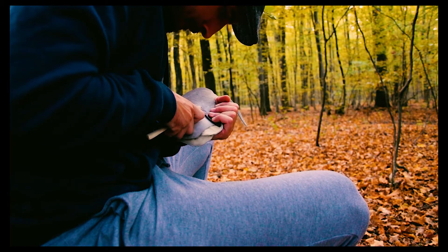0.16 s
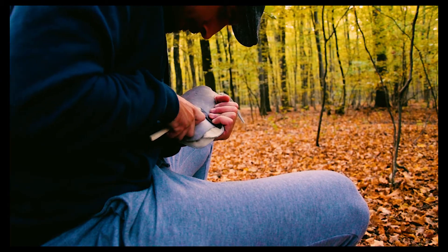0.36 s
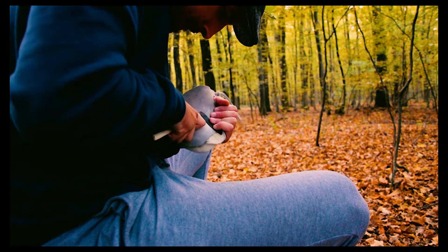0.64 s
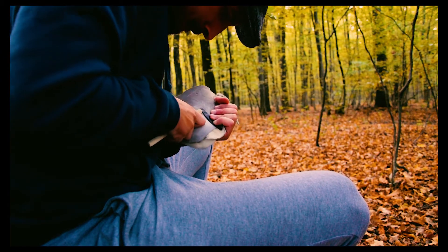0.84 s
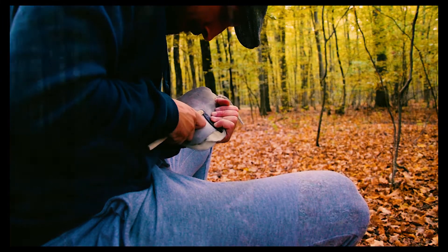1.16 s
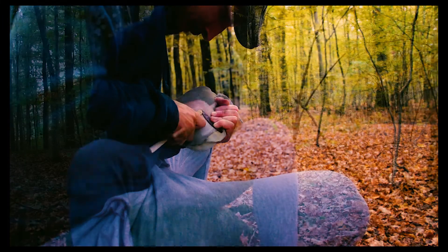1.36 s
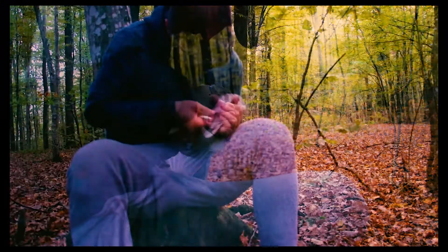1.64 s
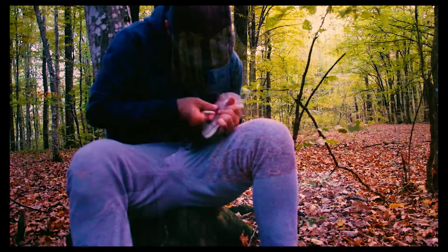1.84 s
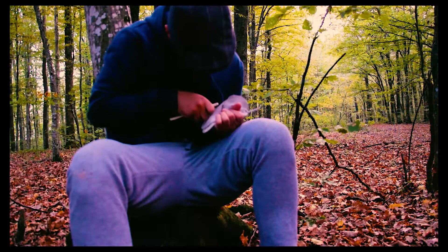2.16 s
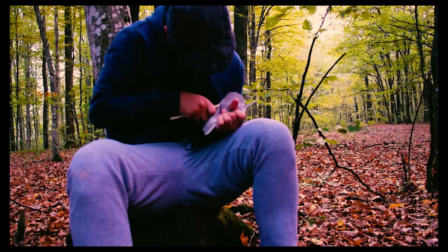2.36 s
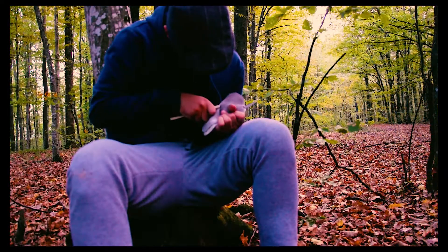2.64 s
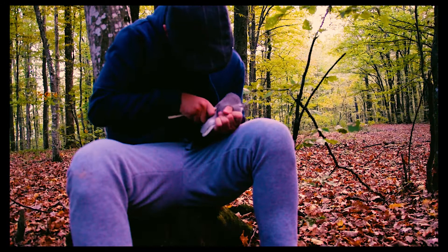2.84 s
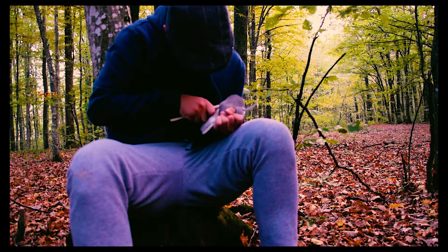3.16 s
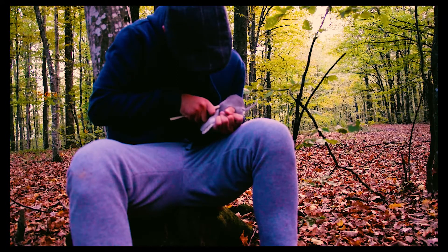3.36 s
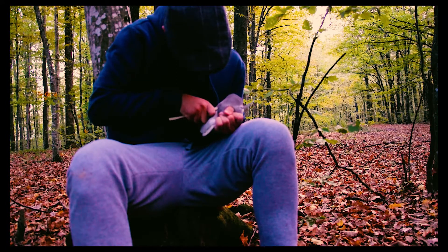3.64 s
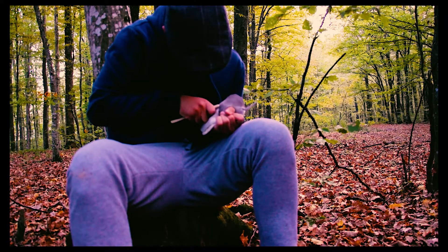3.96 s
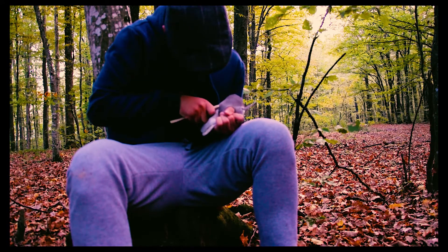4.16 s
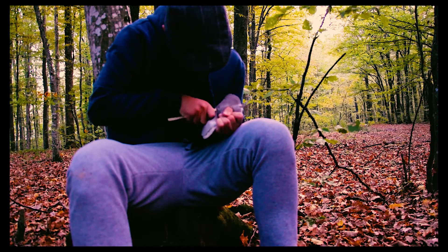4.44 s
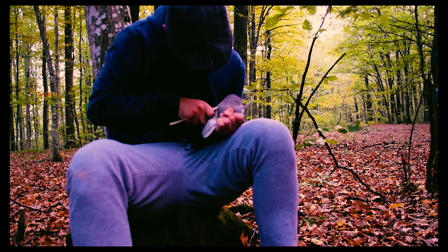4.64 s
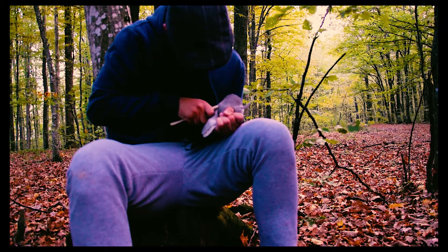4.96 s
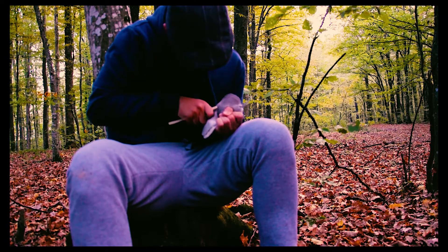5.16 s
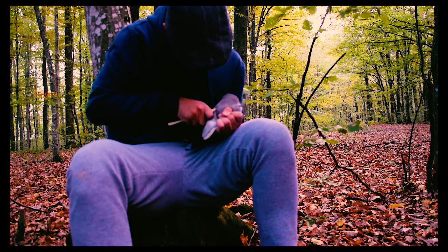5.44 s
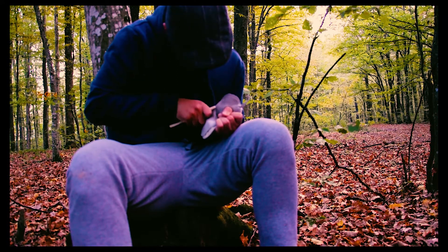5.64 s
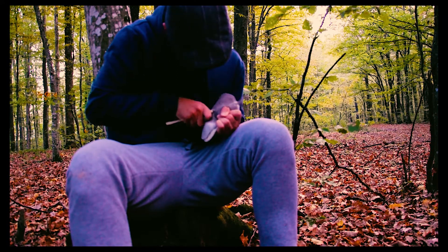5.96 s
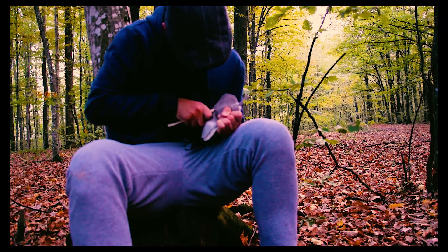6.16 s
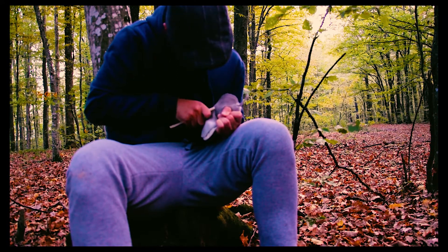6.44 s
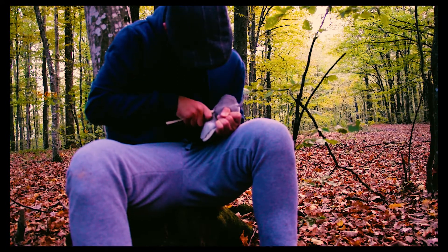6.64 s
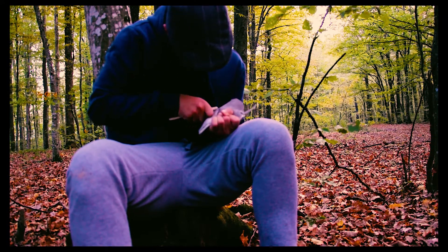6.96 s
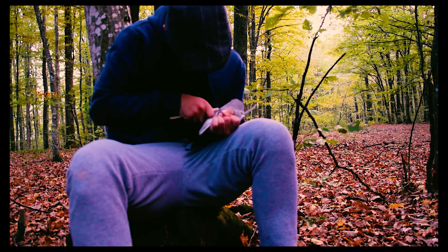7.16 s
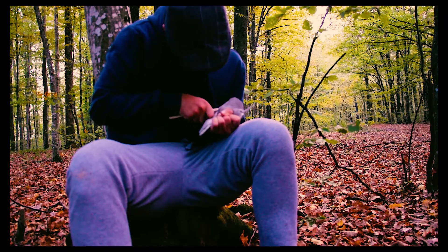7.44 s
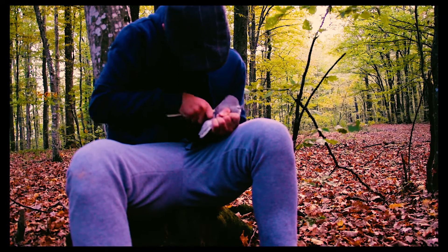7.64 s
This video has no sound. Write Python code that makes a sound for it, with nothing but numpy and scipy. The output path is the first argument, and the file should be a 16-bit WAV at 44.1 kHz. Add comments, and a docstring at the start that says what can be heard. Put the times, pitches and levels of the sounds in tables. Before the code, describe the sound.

Close in front, in a still beech wood, chips are pressed off a flint blade on a leather pad. Soft air hiss and a faint high whine, leaning right, run throughout; the whine shifts slightly around 1.6 seconds. A sharp click with a dull, woody thud comes at 0.5, small scrapes near 0.9 and 1.1, a grit tick at 1.4 and a crisp snap at 1.5. A light click falls at 2.8, then a weak cluster at 3.4 to 3.5. Loud, hard double snaps strike at 4.3 and 5.2, the second the strongest. A bright tick at 5.8 precedes another pair at 5.95; a duller snap follows at 6.6, a scrape at 7.5 and a last light double click at 7.6. From 2.2 to 6.4 a distant small bird gives quick falling-then-arched chirps, with faint whistles at 3.4 and after 7. Trees return short, thin bright tails.

```python
"""Flint chipping in a beech wood

Small chips are pressed off a flint blade held on a leather pad. Each fracture is an impulse through the
resonances of blade, tool and pad; many chips stall and break a second time. Grit ticks and short scrapes are
filtered random pulses. The trees return a thin bright tail of decaying noise, a small bird far off repeats a
two-part call of gliding sines, and a faint high whine of narrow noise bands lies in the still air."""
import sys
import numpy as np
from scipy import signal
from scipy.fft import rfft, irfft
from scipy.io import wavfile

SR = 44100
rng = np.random.default_rng(int(sys.argv[2]) if len(sys.argv) > 2 else 0)


def output_pcm(signal):
    """Save a mono or channel-first signal as 16-bit PCM at the path in sys.argv[1].

    Samples are clipped to [-1, 1] before scaling.
    """
    pcm = np.clip(np.atleast_2d(signal).T, -1, 1) * 32767
    wavfile.write(sys.argv[1], SR, np.round(pcm).astype(np.int16))


N = 343980

# Spectrum of the still air. Each row: frequency in Hz, relative power density in dB.
AIR_SPECTRUM = [(25, -27), (45, -16), (70, -4.5), (180, -5), (370, -0.5), (700, 2), (1400, 0.5),
                (2800, -2.5), (5000, -6), (6400, -14), (7200, -14), (10000, -17), (15000, -23.5)]
# Likeness of the two channels. Each row: frequency in Hz, magnitude-squared coherence from 0 to 1.
AIR_COHERENCE = [(60, 0.99), (130, 0.54), (290, 0.14), (640, 0.25), (1410, 0.073), (3100, 0.23),
                 (6820, 0.083), (15000, 0)]
# Resonances of the whine before and after its change. Each row: centre in Hz, width in Hz, relative level in dB.
WHINE_EARLY = [(1084, 170, -5), (3840, 274, 2.5), (4390, 140, -6), (5400, 430, -7.5), (6160, 580, -11.5)]
WHINE_LATE = [(642, 94, -9), (1892, 127, -7), (3897, 236, 2), (4400, 110, -6), (5500, 470, -10.5),
              (6290, 200, -15)]
# Balance of the whine, mostly to the right. Each row: frequency in Hz, right minus left in dB.
WHINE_BALANCE = [(2400, -1.5), (3800, 6), (6200, 4)]
# A thin steady tone at the very top. In order: frequency in Hz, early rms level in dB, late rms level in dB.
THIN_TONE = (15714, -85, -102)
# Scatter from trunks and dry leaves.
# Each row: band centre in Hz, relative level in dB, 60 dB decay time in seconds before the linger factor.
SCATTER = [(500, -12, 0.44), (2190, -3, 0.6), (3380, -3, 0.66), (4900, 8, 0.58), (7000, 10.5, 0.38),
           (9600, 6, 0.42), (14000, 10, 0.3)]
# The bird's two-part calls. Each row: start in seconds, chirp level in dB.
BIRD_CALLS = [(2.211, -55.5), (2.374, -55), (2.912, -51), (3.085, -51), (3.716, -51), (3.920, -51.5),
              (4.264, -50), (4.419, -50), (4.779, -51), (5.176, -50.5), (5.824, -48), (6.210, -53),
              (6.347, -52)]
# Pitch contours of the falling note and the arched chirp: pitches in Hz at even steps.
FALL_HZ = [7600, 7600, 6450, 4960, 4940, 4900]
CHIRP_HZ = [2370, 2628, 3089, 3658, 3350, 2770, 2440]
# The bird's wavering whistles. Each row: start in seconds, pitch in Hz, level in dB.
WHISTLES = [(3.384, 2500, -62), (7.056, 2340, -62.5), (7.631, 3310, -64.5), (7.697, 2495, -61.5)]
# Harmonics of a whistle, from the fundamental up: level in dB added to that of the whistle.
WHISTLE_PARTIALS_DB = [1.5, -2.5, -14]
# Slips of the tool tip on the edge. Each row: start in seconds, level in dB, length in seconds.
SCRAPES = [(0.886, -48.5, 0.0086), (0.897, -49.5, 0.014), (1.061, -58.5, 0.0097), (6.557, -53, 0.011),
           (7.473, -53, 0.0042)]
# The loudest grains of grit crushed at the edge. Each row: start in seconds, peak level in dB.
LOUD_GRIT = [(0.837, -44.5), (1.384, -38), (1.4275, -43.5), (4.9293, -47), (5.7888, -35), (6.0764, -46),
             (6.692, -40)]
# Chips pressed off the blade. Each row: start in seconds, force in dB, ring pitch in Hz, pad thud in dB,
# tool knock in dB, crack centre in Hz, crack in dB relative to the force,
# stall before the second break in seconds, strength of the second break as a ratio to the first.
SNAPS = [(0.5341, 10.5, 2220, 14, 13, 5950, 2, 0.003, 0.38),
         (1.5131, 13.5, 2060, 3.5, 9.5, 11400, -9, 0.000049, 0),
         (2.8225, -1, 2360, -2.5, 1.5, 4250, -11.5, 0.0033, 1.2),
         (3.4338, -13, 2160, 3, -15, 4200, -6.5, 0.0023, 0.5),
         (3.4754, -16.5, 2100, -5, -20, 4200, -5, 0.0056, 0),
         (3.5156, -0.5, 2380, 3, 0.5, 4400, -13.5, 0.0028, 1.7),
         (4.3005, 21.5, 2670, 4.5, 7.5, 4000, -11, 0, 0),
         (4.335, 16.5, 2430, 6, 5.5, 4750, -10.5, 0.0026, 1.34),
         (5.1998, 11.5, 2300, -3, 4.5, 4160, -7, 0, 0), (5.2671, 24, 2770, -1, 11.5, 3980, -10.5, 0, 0),
         (5.9424, 16, 2350, -11, 9, 8350, -9.5, 0.0044, 0.47),
         (5.9749, 3, 2620, -2.5, -4, 4700, -15, .0037, 3.5),
         (6.6049, 10.5, 2310, -1, -8.5, 9000, -19, 0, 0),
         (7.5748, -2.5, 2150, 4.5, 1, 4800, -8, .0014, 0.97)]
# High modes of the blade, heard as the crack. Each row: centre in Hz, width in Hz, level in dB.
BLADE_MODES = [(4150, 480, 1.5), (5920, 1180, -2.5), (8540, 960, -2), (9780, 620, 0), (11500, 1600, -5.5)]
# Response of the pad as the blade settles into it.
# Each row: time in seconds, thud pitch in Hz, ratio of width to pitch, palm in dB relative to the thud.
PAD = [(.5, 572, 0.98, -38), (3.5, 470, 0.83, -24), (5.3, 440, 1.45, -3.5), (7.6, 434, 1.4, -10.5)]

FALL_DB, FALL_S = -61.5, 0.019
CHIRP_AFTER_S, CHIRP_S = 0.064, 0.031  # the chirp's delay after the start of the fall, and its length
WHISTLE_S = 0.0294
FINE_GRIT_DB, FINE_GRIT_SPREAD_DB = -56, 3  # mean and standard deviation of the peak level
CRACK_FALL_DB_PER_OCTAVE = 5.5  # modes away from the crack's centre are struck less
SECOND_PITCH = 0.94  # a second break rings a little lower
PALM_HZ, PALM_WIDTH_HZ = 166, 99
TOP_HZ = 16300

TIME = np.arange(N) / SR
FREQ = np.maximum(np.fft.rfftfreq(N, 1 / SR), 1)
SHORT = 2048  # samples in one brief sound
SHORT_TIME = np.arange(SHORT) / SR
SHORT_FREQ = np.maximum(np.fft.rfftfreq(SHORT, 1 / SR), 1)
MID_SIDE = np.array([[1], [-1]])  # sign of the side signal in left and right
LEFT_RIGHT = np.array([[-1], [1]])


def amp(db):
    """Gain is ten to the power of a twentieth of the decibels."""
    return 10 ** (np.asarray(db) / 20)


def unit(x):
    """Dividing by the rms gives unit rms."""
    return x / np.sqrt(np.mean(x ** 2))


def band(freq, hz, width):
    """A damped oscillator responds most near its own frequency, here with gain 1 at the centre."""
    return 1 / (1 + 1j * (freq ** 2 - hz ** 2) / (freq * width))


def along(points, freq):
    """Linear interpolation on a log-frequency axis joins (Hz, value) points."""
    hz, value = np.transpose(points)
    return np.interp(np.log(freq), np.log(hz), value)


def add(track, s, sound):
    """Superposition: a sound starting at s seconds sums into the track."""
    start = int(round(s * SR))
    track[start:start + len(sound)] += sound[:N - start]


def pan(x, right_db):
    """A level difference between the channels places a sound to one side."""
    return amp(LEFT_RIGHT * right_db / 2) * x


def hiss(gain, right_db=0):
    """Sums and differences of two independent noises set the coherence of a stereo pair of unit rms."""
    alike = np.sqrt(np.clip(along(AIR_COHERENCE, FREQ), 0, 1))
    mid, side = rfft(rng.standard_normal((2, N)))
    pair = mid * np.sqrt(1 + alike) + side * np.sqrt(1 - alike) * MID_SIDE
    return unit(irfft(gain * pan(pair, right_db), N))


def whine(resonances):
    """Narrow-band noise wavers around a pitch; the powers of the resonances add."""
    power = sum(np.abs(amp(db) * band(FREQ, hz, width) ** 2) ** 2 for hz, width, db in resonances)
    return hiss(np.sqrt(power), along(WHINE_BALANCE, FREQ))


def background(change_s=1.57, change_length_s=0.48):
    """An equal-power crossfade lifts the whine slightly in pitch as the thin tone recedes over still air."""
    late = np.clip((TIME - change_s) / change_length_s + 0.5, 0, 1)
    early_whine = amp(-57.0) * np.sqrt(1 - late) * whine(WHINE_EARLY)
    late_whine = amp(-56) * np.sqrt(late) * whine(WHINE_LATE)
    hz, early_db, late_db = THIN_TONE
    tone_level = amp(early_db + late * (late_db - early_db))
    tone = np.sqrt(2) * tone_level * np.sin(2 * np.pi * hz * TIME)
    air = amp(-59.0) * hiss(amp(along(AIR_SPECTRUM, FREQ)))
    return early_whine + late_whine + tone + air


def wood(x, db, linger, apart):
    """Multiple scattering from trees acts as decaying noise, whose top bands die sooner than the middle."""
    t, freq = TIME[:SR], np.arange(SR // 2 + 1) + 1
    mid, side = rfft(rng.standard_normal((2, SR)))
    noise = (mid + apart * side * MID_SIDE) / np.sqrt(SR)
    centres = np.array(SCATTER)[:, 0]
    echoes = 0
    for (hz, band_db, t60), own in zip(SCATTER, np.eye(len(SCATTER))):
        share = along(np.transpose([centres, own]), freq)  # 1 at its own centre, 0 at the others
        echoes = echoes + irfft(noise * share) * amp(band_db - 60 * t / (t60 * linger))
    return amp(db) * signal.fftconvolve(x[None], echoes, axes=1)[:, :N]


def knees(x, db, left_s, right_s):
    """Specular reflection: each knee throws back one weak, early copy."""
    return amp(db) * np.array([np.interp(TIME - lag, TIME, x, left=0) for lag in (left_s, right_s)])


def note(length, contour, waver):
    """Frequency modulation: a sine's phase accumulates a gliding, randomly varied pitch."""
    u = np.linspace(0, 1, int(length * SR))
    pitches = np.asarray(contour) * (1 + waver * rng.standard_normal(len(contour)))
    hz = np.interp(u, np.linspace(0, 1, len(contour)), pitches)
    swell = np.sqrt(2) * np.sin(np.pi * u)
    return swell * np.sin(2 * np.pi * np.cumsum(hz) / SR)


def bird():
    """Gliding tones form a quick fall answered by an arched chirp; wavering partials form the whistles."""
    out = np.zeros(N)
    for s, db in BIRD_CALLS:
        add(out, s, amp(FALL_DB) * note(FALL_S, FALL_HZ, waver=0.027))
        add(out, s + CHIRP_AFTER_S, amp(db) * note(CHIRP_S, CHIRP_HZ, waver=0.057))
    for s, hz, db in WHISTLES:
        for k, partial_db in enumerate(WHISTLE_PARTIALS_DB, 1):
            partial = note(WHISTLE_S, np.full(7, k * hz), waver=0.03)
            add(out, s, amp(db + partial_db) * partial)
    return out


def scrapes(body_hz=1150, width_hz=1900):
    """Stick-slip friction: dense random slips grate dully through the tool's resonance."""
    out = np.zeros(N)
    for s, db, length in SCRAPES:
        swell = np.sin(np.pi * np.minimum(SHORT_TIME / length, 1))
        slips = swell * rng.standard_normal(SHORT) ** 3  # cubing makes the noise spiky
        grating = irfft(rfft(slips) * band(SHORT_FREQ, body_hz, width_hz) ** 4)
        add(out, s, amp(db) * np.sqrt(length * SR) * grating / np.linalg.norm(grating))
    return out


def crumble(db, decay_s):
    """Brittle failure: the spectrum of one clean break and a fading shower of micro-cracks."""
    shower = rng.standard_normal(SHORT) ** 3 * np.exp(-SHORT_TIME / decay_s)
    return 1 + amp(db) * rfft(shower) / np.linalg.norm(shower)


def grit(count=7):
    """Brittle crushing: grains too light to move the blade give thin ticks, the fine ones at random times."""
    out = np.zeros(N)
    fine = [(rng.uniform(0, TIME[-1]), rng.normal(FINE_GRIT_DB, FINE_GRIT_SPREAD_DB)) for _ in range(count)]
    for s, db in LOUD_GRIT + fine:
        tick = irfft(band(SHORT_FREQ, hz=9000, width=8500) ** 2 * crumble(db=0, decay_s=0.00079))
        add(out, s, amp(db) * tick / np.abs(tick).max())
    return out


def fracture(force_db, ring_hz, knock_db, crack_hz, crack_db, thud=0, ring_width_hz=880,
             tool_hz=1190, tool_width_hz=820, edge_hz=13000):
    """Sudden release excites modes: grip sets the ring, chip size the high modes, and the tool recoils."""
    f = SHORT_FREQ
    # a crack takes a moment to run, which softens the top
    release = 1 / (1 + 1j * np.sqrt(2) * f / edge_hz - (f / edge_hz) ** 2)
    ring = amp(force_db) * band(f, ring_hz, ring_width_hz) ** 2
    knock = amp(knock_db) * band(f, tool_hz, tool_width_hz) ** 3
    crack = 0
    for k, (hz, width, db) in enumerate(BLADE_MODES):
        mode_db = force_db + crack_db + db - CRACK_FALL_DB_PER_OCTAVE * abs(np.log2(hz / crack_hz))
        crack = crack + (-1) ** k * amp(mode_db) * band(f, hz, width)  # neighbours alternate in sign
    body = (ring + thud - knock) * crumble(db=-17, decay_s=0.0036)
    return irfft((body - crack * crumble(db=-8.5, decay_s=0.0022)) * release)


def snaps():
    """Arrested fracture: the first break thuds into pad and palm, and a stalled chip breaks free later."""
    out = np.zeros(N)
    pad_s, *pad = np.transpose(PAD)
    for s, force_db, ring_hz, thud_db, knock_db, crack_hz, crack_db, stall_s, second in SNAPS:
        thud_hz, width_ratio, palm_db = (np.interp(s, pad_s, column) for column in pad)
        palm = amp(palm_db) * band(SHORT_FREQ, PALM_HZ, PALM_WIDTH_HZ) ** 2
        thud = amp(thud_db) * (band(SHORT_FREQ, thud_hz, thud_hz * width_ratio) ** 3 + palm)
        add(out, s, fracture(force_db, ring_hz, knock_db, crack_hz, crack_db, thud))
        second_break = fracture(force_db, ring_hz * SECOND_PITCH, knock_db, crack_hz, crack_db)
        add(out, s + stall_s, second * second_break)
    return out


def scene(close_db=-7):
    """Direct-to-reverberant ratio conveys distance: hands straight ahead, closest at first; bird far off."""
    flint = snaps() + grit() + scrapes()
    song = bird()
    distance = amp(np.interp(TIME, [1.5, 2], [close_db, 0]))  # up close the wood's share is smaller
    flint_tail = wood(flint * distance, db=-9.0, linger=0.79, apart=0.45)
    near = flint + knees(flint, db=-18, left_s=0.001074, right_s=0.00151) + flint_tail
    dulled = irfft(rfft(song) * band(FREQ, hz=2620, width=1360), N)  # the long way round takes the treble
    song_tail = wood(dulled, db=17.5, linger=1.68, apart=0.36)
    far = amp(-1.5) * pan(song, right_db=3.5) + song_tail
    return near + far + background()


def record(dry):
    """Band limiting and saturation: an elliptic low-pass cuts the top, then peaks clip at full scale."""
    low_pass = signal.ellip(8, 0.2, 70, TOP_HZ, fs=SR, output="sos")
    return np.clip(signal.sosfilt(low_pass, dry), -1, 1)


dry = scene()
out = record(dry)
output_pcm(out)
```